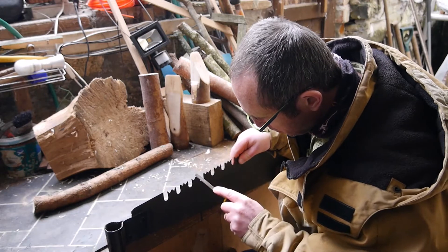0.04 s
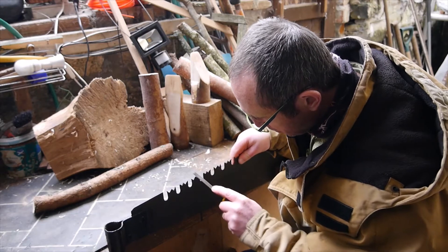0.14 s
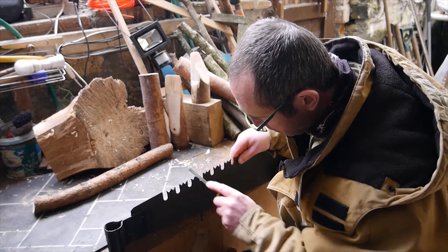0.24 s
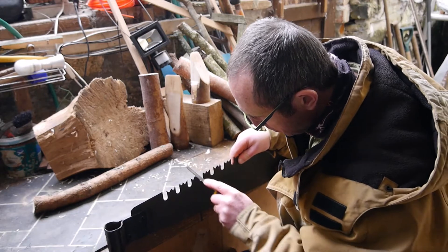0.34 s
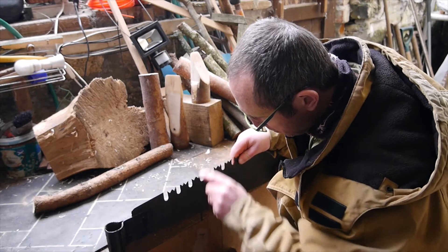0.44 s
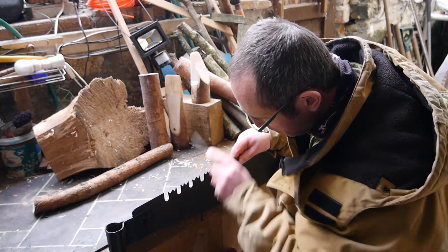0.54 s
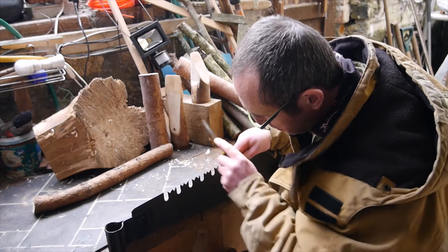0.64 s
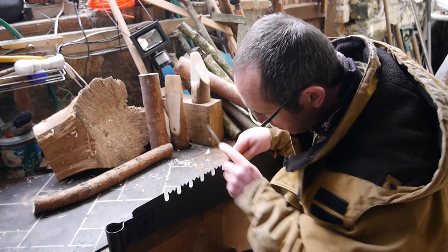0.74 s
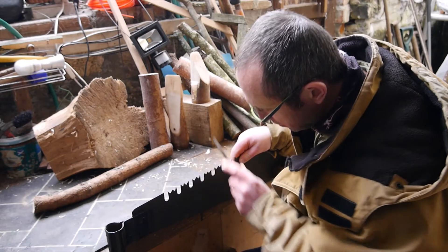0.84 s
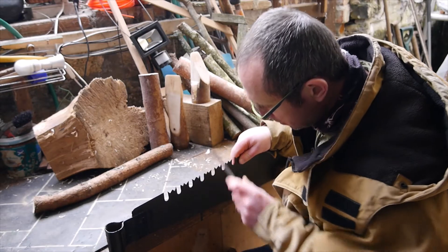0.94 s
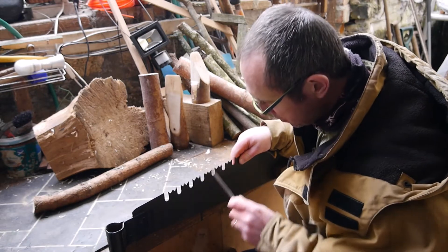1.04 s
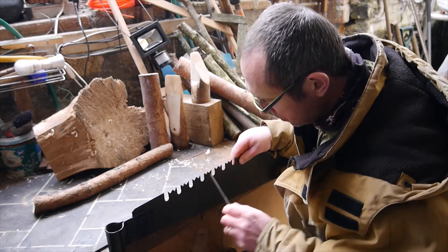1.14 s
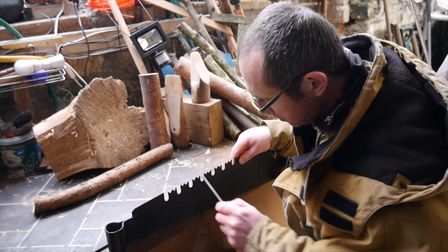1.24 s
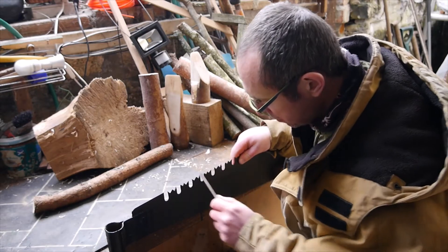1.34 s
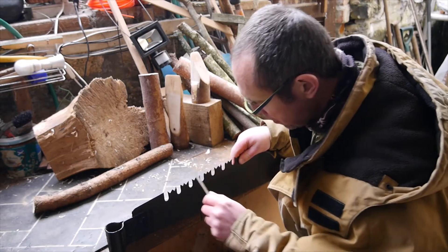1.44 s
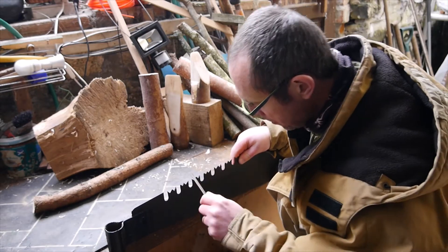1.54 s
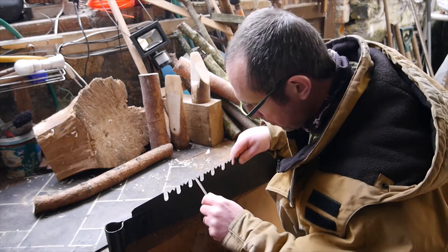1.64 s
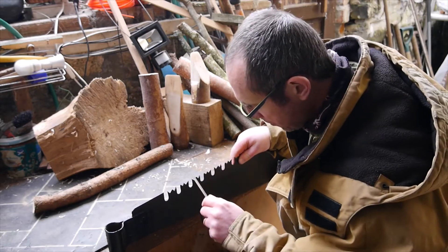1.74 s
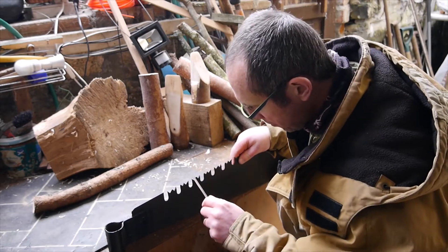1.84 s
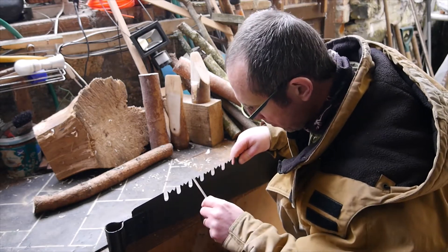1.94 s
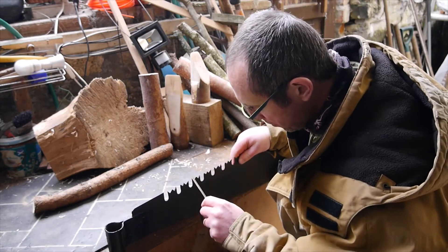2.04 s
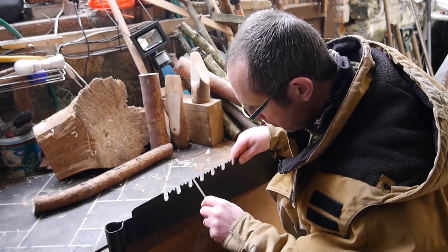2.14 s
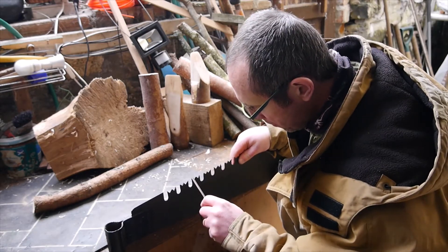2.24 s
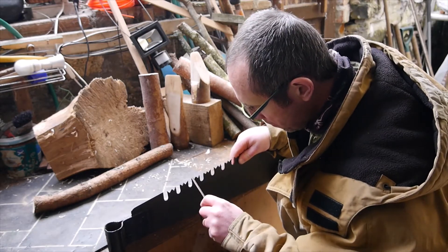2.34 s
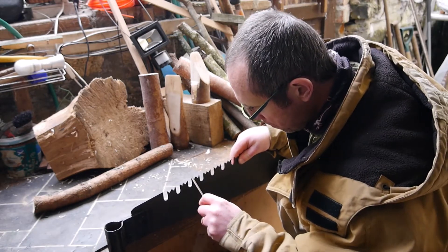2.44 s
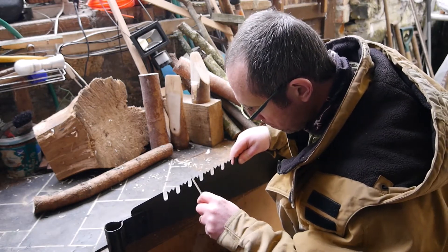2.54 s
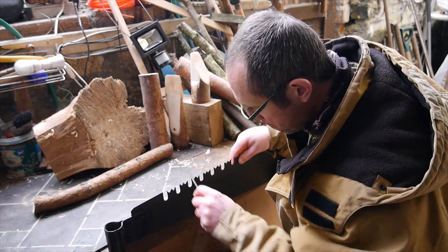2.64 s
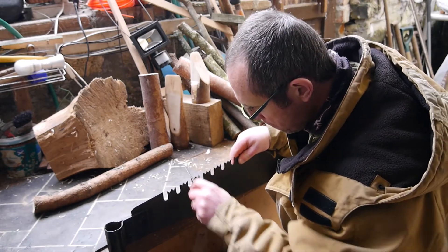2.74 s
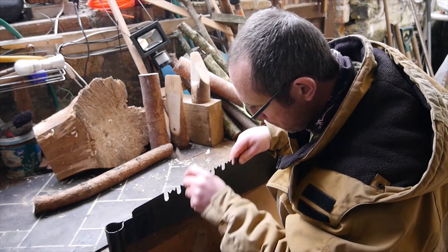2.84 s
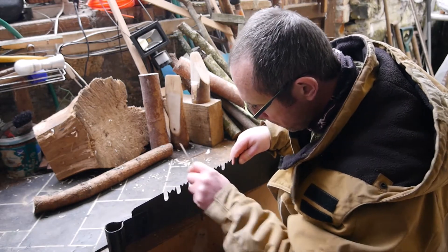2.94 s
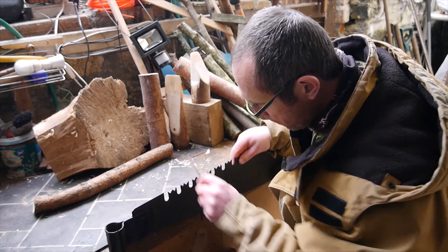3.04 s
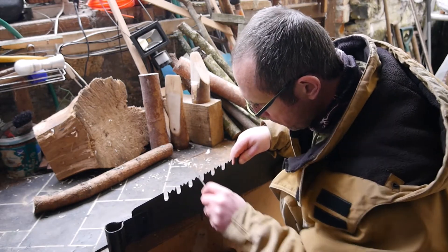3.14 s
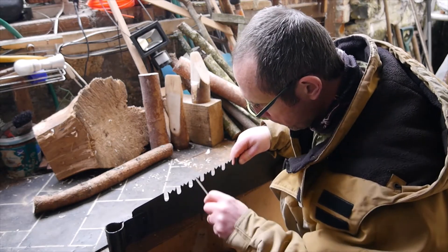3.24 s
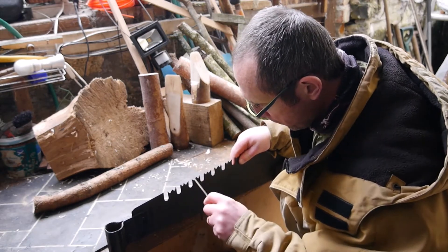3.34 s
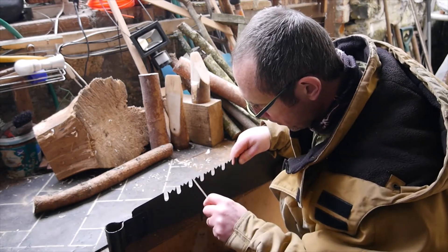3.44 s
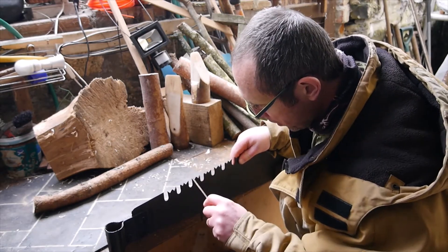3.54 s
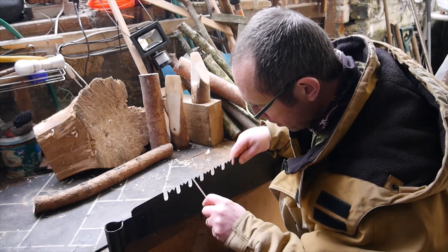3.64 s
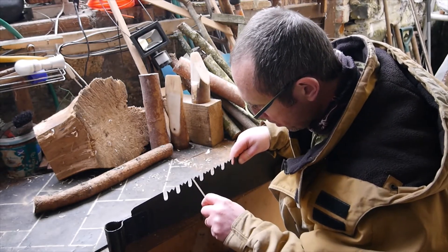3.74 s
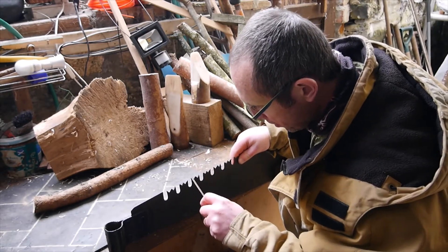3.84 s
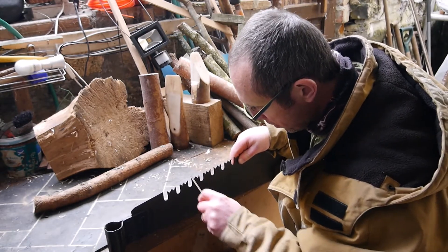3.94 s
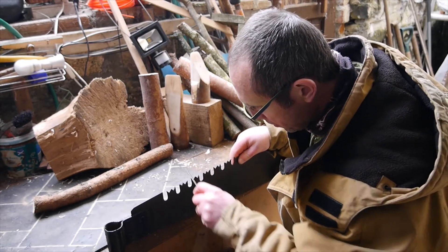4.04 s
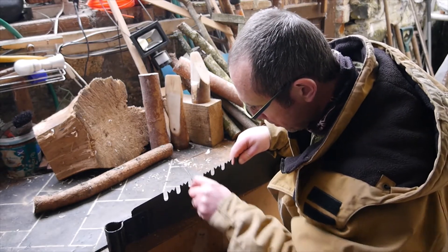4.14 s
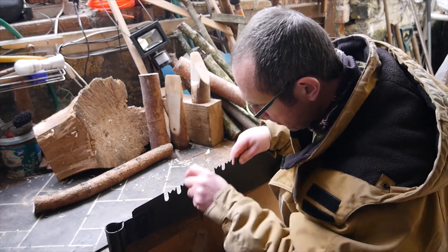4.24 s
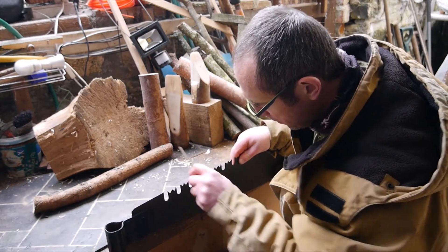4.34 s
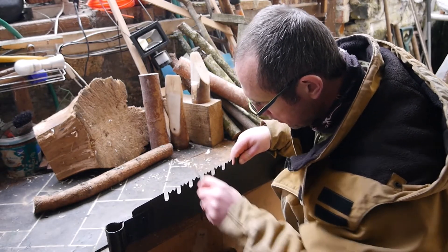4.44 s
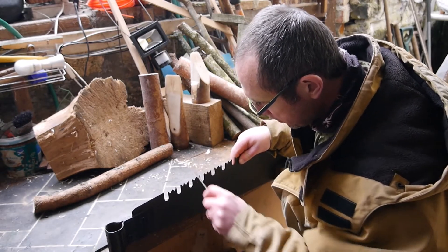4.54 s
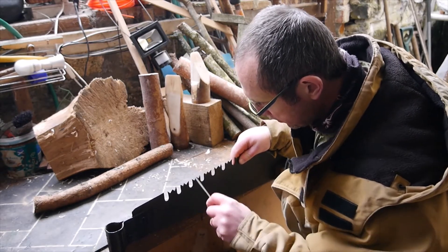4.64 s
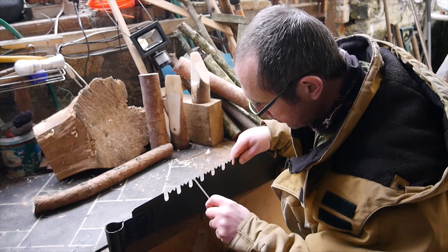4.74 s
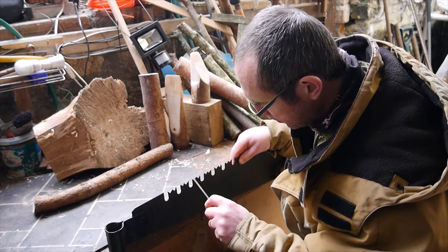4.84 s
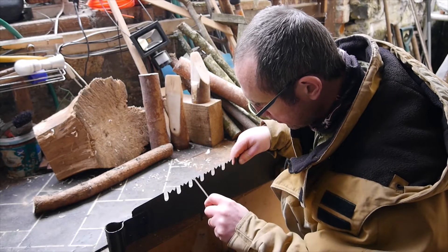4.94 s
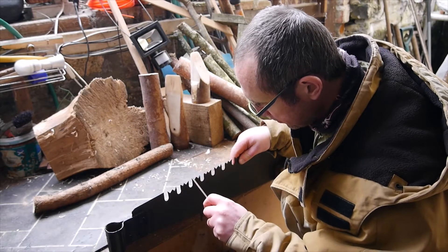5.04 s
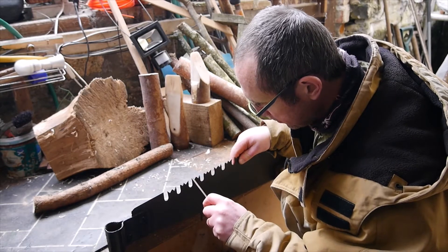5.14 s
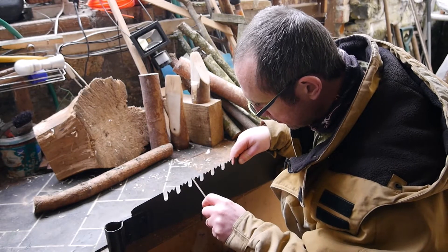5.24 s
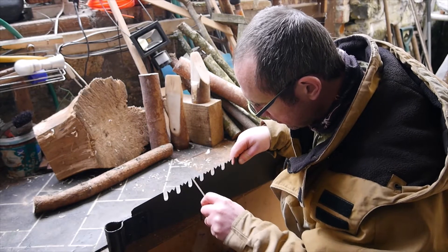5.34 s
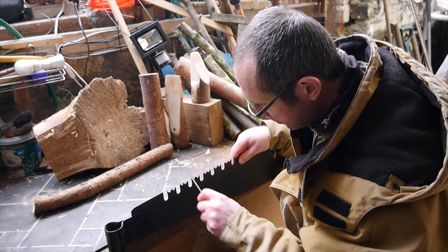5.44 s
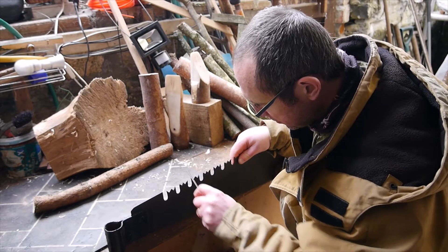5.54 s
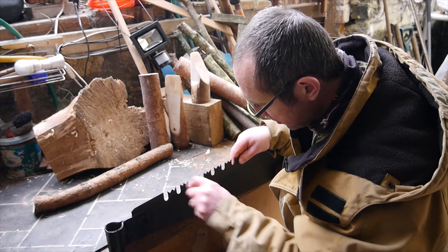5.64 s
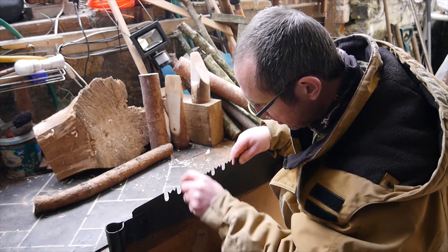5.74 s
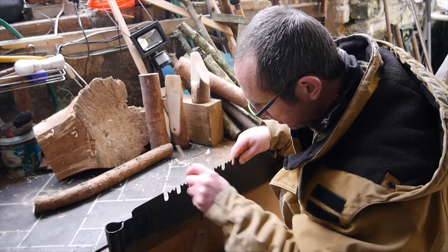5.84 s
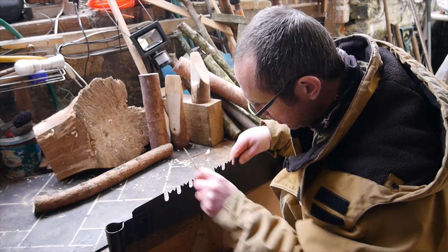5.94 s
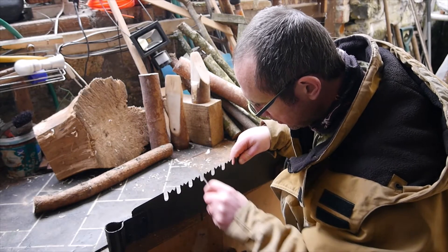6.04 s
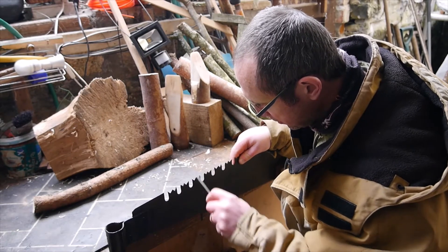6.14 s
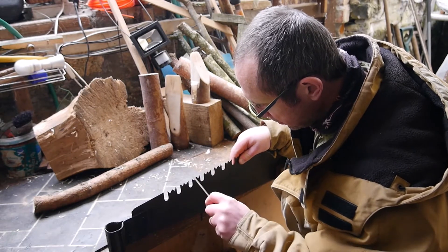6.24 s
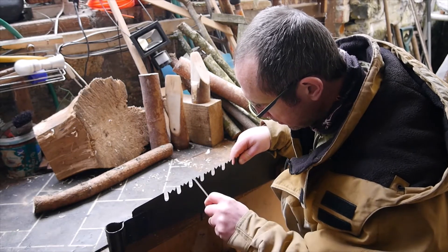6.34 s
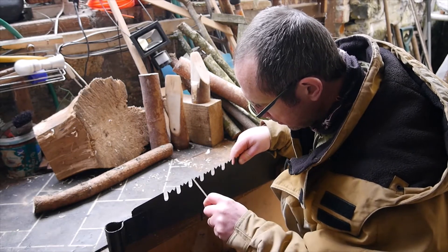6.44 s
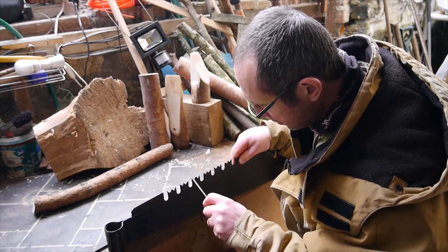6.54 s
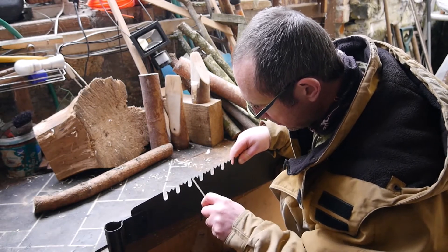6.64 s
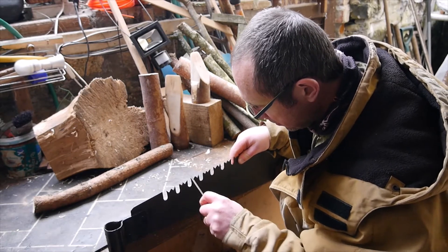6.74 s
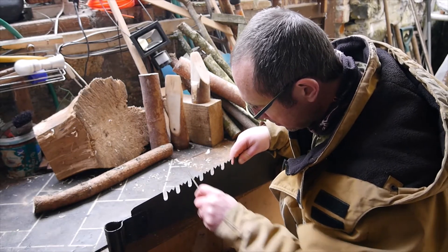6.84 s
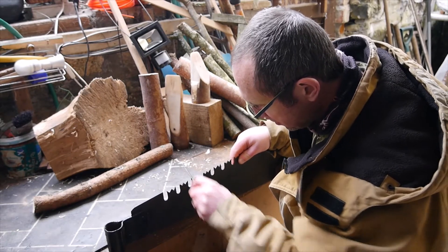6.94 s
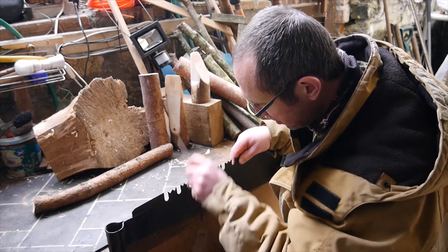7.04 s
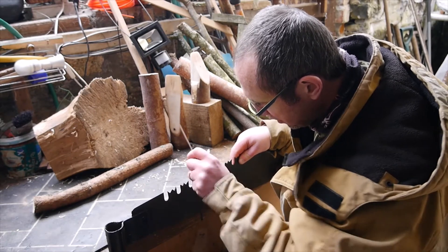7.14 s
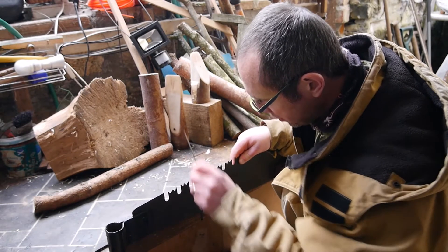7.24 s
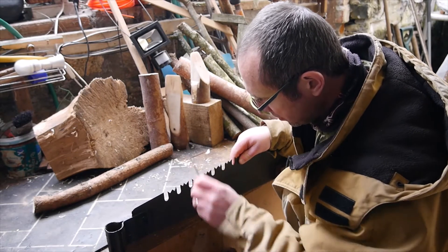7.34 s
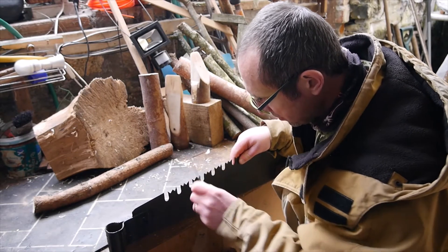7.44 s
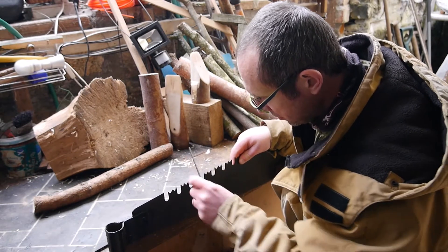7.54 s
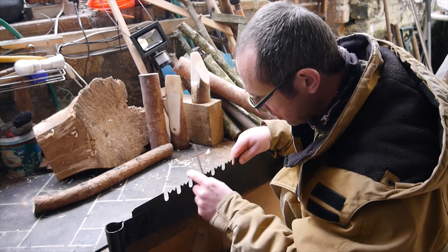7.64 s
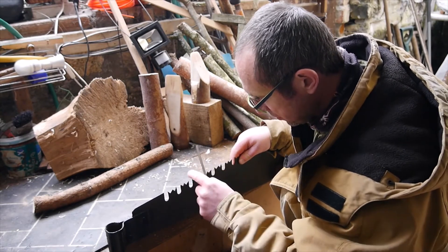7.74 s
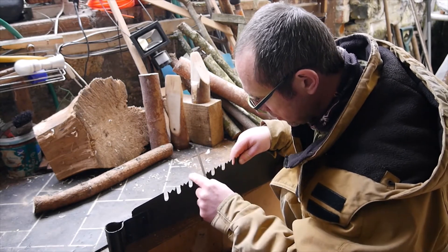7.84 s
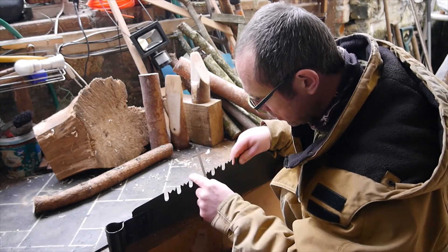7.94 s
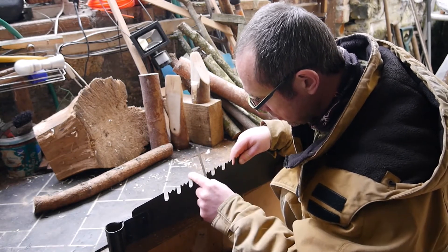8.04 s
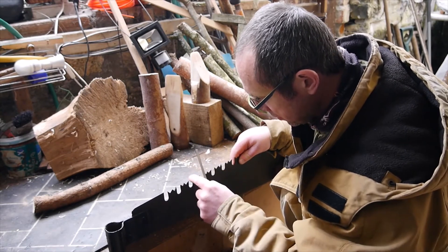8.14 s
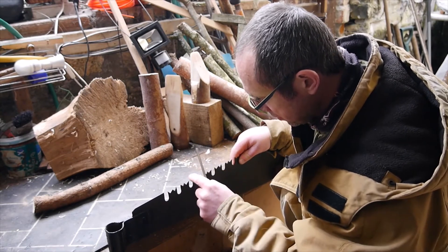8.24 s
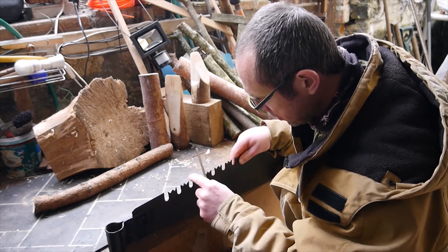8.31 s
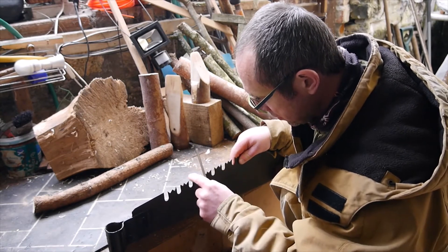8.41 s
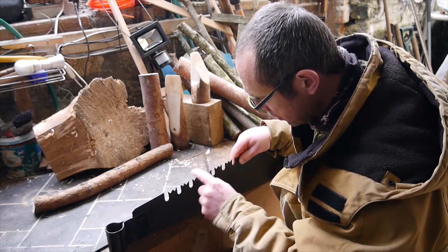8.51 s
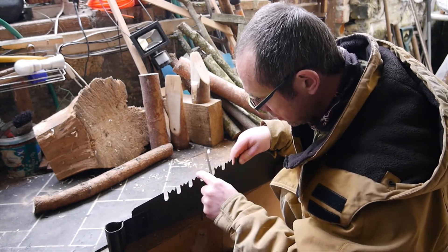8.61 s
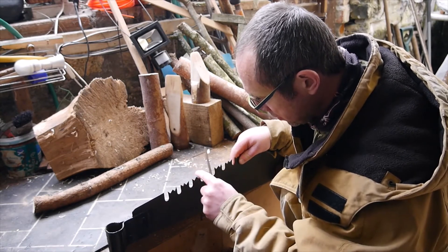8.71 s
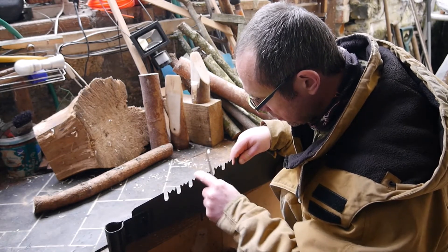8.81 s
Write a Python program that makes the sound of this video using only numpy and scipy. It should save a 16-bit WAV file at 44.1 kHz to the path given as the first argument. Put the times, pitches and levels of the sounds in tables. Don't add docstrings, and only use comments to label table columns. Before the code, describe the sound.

A small steel file rasps five slow strokes across a big saw's teeth, knocking the wooden bench, while a bird whistles faintly outside.

```python
import sys
import numpy as np
from scipy import signal
from scipy.fft import rfft, irfft, next_fast_len
from scipy.io import wavfile
from scipy.ndimage import uniform_filter1d

SR = 44100
rng = np.random.default_rng(int(sys.argv[2]) if len(sys.argv) > 2 else 0)


def to_linear_factor(level_db):
    exponent = np.asarray(level_db, float) / 20
    return 10 ** exponent


def inscribe(sig):
    pcm = np.round(np.clip(np.atleast_2d(sig).T, -1, 1) * 32767)
    wavfile.write(sys.argv[1], SR, pcm.astype(np.int16))


N = 391166

# [t/s, pressure level/dB, speed level/dB]
STROKES = [
    [(0.16, -29.5, -50), (0.178, -30.5, -43), (0.354, -19.5, -34), (0.372, -27, -38.5),
     (0.392, -21.5, -36.5), (0.476, -25, -28.5), (0.52, -22.5, -17.5), (0.55, -30.5, -28)],
    [(2.43, -63, -59), (2.448, -32, -52), (2.458, -36.5, -42.5), (2.512, -38, -50), (2.526, -32.5, -40),
     (2.666, -17.5, -35), (2.812, -17.5, -21), (2.85, -27, -26.5)],
    [(3.89, -44, -70), (3.902, -37, -42.5), (3.95, -20.5, -32), (4.0, -20.5, -29.5), (4.076, -13.5, -27),
     (4.116, -19, -27), (4.228, -16.5, -20), (4.27, -28, -33)],
    [(5.35, -36, -53), (5.368, -26.5, -46), (5.456, -28, -34), (5.496, -23, -34), (5.536, -22.5, -38),
     (5.686, -13.5, -26), (5.764, -27.5, -16), (5.79, -29.5, -31.5)],
    [(6.71, -43, -59), (6.726, -28.5, -49), (6.78, -21.5, -34), (6.804, -27.5, -56), (6.816, -15.5, -30),
     (6.926, -15.5, -24), (7.026, -18.5, -18.5), (7.05, -23, -27)],
]
STROKE_LEG_DB = [-4, -5, -8, -5, -10.5]
# [t/s, length/s, pressure level/dB, speed level/dB]
DRAGS = [(0.063, 0.11, -45, -59), (0.716, 0.39, -45.5, -48.5), (1.12, .04, -52, -60),
         (2.073, 0.043, -49, -45), (2.289, 0.028, -39, -51.5), (2.355, 0.033, -49, -66),
         (2.95, 0.066, -45, -57), (5.323, .04, -44, -60), (5.594, .05, -24, -34),
         (5.745, 0.029, -30, -18.5), (0.137, .03, -38, -59), (0.931, 0.065, -45, -57),
         (8.098, .03, -56, -59), (7.484, 0.029, -52, -68), (3.067, 0.079, -46, -60),
         (3.518, 0.077, -46, -41.5), (3.726, 0.06, -30, -41.5), (3.819, 0.058, -36, -54),
         (4.413, 0.11, -42, -55), (5.077, .12, -45.5, -49), (5.245, 0.071, -44, -62),
         (6.05, 0.04, -41, -52.5), (6.438, 0.082, -45, -70), (6.656, 0.093, -41.5, -61),
         (7.16, 0.34, -55.5, -59.5)]
# [t/s, ring level/dB, knock re ring level/dB]
TAPS = [(0.1786, -39, 15.5), (2.0354, -48, 3), (2.0822, -43, -5), (2.2872, -48, -11), (2.4554, -44, 19),
        (2.5279, -41.5, 17), (3.5222, -29, -19), (3.7187, -45, -4), (3.7409, -38, 8), (3.8272, -46.5, 13),
        (3.903, -37, 10.5), (5.0943, -30.5, -13), (5.367, -37, 6), (5.5722, -40, 20), (6.059, -45, -13),
        (6.725, -37, 17), (6.7645, -40, 5), (6.8143, -29.5, 16), (8.1094, -49, 8)]
# [t/s, knock level/dB]
CATCHES = [(0.307, -10.5), (2.612, -16.5), (2.699, -17), (2.769, -7.5), (3.546, -31.5), (3.948, -16),
           (4.024, -15), (4.066, -5.5), (4.083, -12), (4.171, -5.5), (5.368, -23), (5.478, -19),
           (5.494, -9.5), (5.625, -4.5), (5.708, -7), (6.844, -2), (6.861, -6), (6.91, -7), (6.929, -8)]
# [t/s, f/Hz, level/dB, t60/s]
LONE_RINGS = [(.53, 4940, -32, .2), (1.13, 210, -35.5, .15), (2.87, 195, -31.5, .5), (3.89, 190, -27, 0.37),
              (5.092, 6000, -38, 0.14), (5.44, 5990, -32, .2), (7.09, 255, -36, .35),
              (4.22, 4390, -22, 0.21), (5.75, 3400, -16, 0.1), (8.108, 6000, -49, .1),
              (5.761, 200, -18, 0.26), (5.803, 722, -18, 0.11), (7.009, 5980, -16, 0.13),
              (5.748, 6100, -18, 0.13), (6.07, 93.6, -37.5, 0.42), (6.8, 102.5, -25.5, 0.48),
              (6.9, 627, -9, 0.37)]
# [f/Hz, width/Hz, level/dB]
LEG_MODES = [(200, 15.5, -6), (249, 28, -7), (297, 74, -16), (349, 112, -9.5)]
BENCH_MODES = [(403, 14, -13), (470.4, 37, -4.5), (578.2, 38.6, -1), (628, 26.4, -2), (711.6, 31.5, -7),
               (891, 26, -10.5), (950.6, 40, -2)]
CLAMP_MODES = [(1640, 220, -16), (2400, 31, -3), (2670, 114, -5)]
BLADE_MODES = [(4175, 55, -2), (4385, 45, -5), (5770, 45, -9), (5990, 60, -1), (6170, 45, -10),
               (6920, 45, -8), (7200, 110, -7), (7655, 60, -6), (8050, 35, -10), (8200, 35, -6),
               (8400, 130, -3), (9160, 60, 0), (9340, 40, -5), (10250, 60, -5), (10600, 45, -11),
               (11100, 230, -15), (11900, 45, -18), (13400, 200, -28), (13900, 48, -21), (14400, 42, -25)]
# [f/Hz, density level/dB per Hz]
LEG_CROWD = [(59, -46), (100, -20), (194, -7.5), (329, -2.5), (390, -7), (510, -49), (860, -120)]
BENCH_CROWD = [(210, -30), (360, -3.5), (521, -3), (619, 1), (782, -5), (1250, -19), (1620, -18),
               (2750, -120)]
CLAMP_CROWD = [(650, -31), (1100, -6), (1670, 0.5), (1970, -3.5), (2920, -9), (3530, -15.5), (3800, -4),
               (4940, -40), (8360, -120)]
BLADE_CROWD = [(2180, -17.5), (3700, -8), (4230, -3.5), (5180, -4), (5820, -5.5), (6580, -6), (9450, 2.5),
               (13200, -19.5), (14400, -22), (15500, -28), (16000, -54)]
# [f/Hz, t60/s]
CROWD_T60 = [(100, 0.29), (500, 0.079), (2000, 0.1), (6000, 0.099), (14000, 0.045)]
# [f/Hz, width/Hz, level/dB]
MODE_GAPS = [(3700, 190, -10.5), (5370, 270, -1.5)]
# [f/Hz, likeness/1]
NEAR_SAME = [(60, 0.96), (200, 0.99), (600, 0.99), (1000, 0.76), (1600, .6), (3000, 0.45), (5500, 0.68),
             (9000, 0.47), (13000, 0.55)]
# [f/Hz, level/dB]
NEAR_LEFT = [(60, 4), (240, 0), (950, 1.5), (3770, 2.5), (15000, 2)]
# [t/s, length/s, first pitch f/Hz, slide/Hz, level/dB]
NOTES = [
    (1.765, .125, 7300, -140, -48.5),
    (1.903, 0.077, 5800, -170, -50.5),
    (2.002, 0.13, 6970, -83, -46),
    (2.238, 0.12, 4335, 30, -42.5),
    (5.986, .1, 7330, -110, -52),
    (6.11, .11, 5910, -170, -60),
    (6.2, 0.18, 7030, -87, -57),
    (6.432, 0.032, 4250, 110, -40),
    (6.485, 0.064, 4340, 10, -47.5),
    (6.602, 0.12, 7220, -110, -52.5),
]
# [f/Hz, density level/dB per Hz]
WASH = [(18, -60), (30, -45), (65, 4.5), (103, -21), (190, -5), (443, -7), (544, -5.5), (638, -8),
        (699, -6), (7000, -26), (9100, -53), (15400, -120)]
# [f/Hz, density level/dB per Hz]
HISS = [(3530, -56), (6000, -18), (7290, -10.5), (9720, -1.5), (11900, -15.5), (15100, -21), (15800, -17)]
# [f/Hz, likeness/1]
HUSH_SAME = [(60, 0.38), (180, 0.96), (550, 0.27), (1650, 0.3), (4970, 0.027), (15000, 0.4)]


def filing():
    legs_db, pressure_db, speed_db = contact()
    coarse = slips(500, 1.97, 2.4, 0.57)
    fine = slips(3000, 3.6, 2.07, 0.55)
    clamp_gain = to_linear_factor(-3 + pressure_db + 0.86 * (speed_db - pressure_db))
    clamp_gain = clamp_gain / np.hypot(1, clamp_gain / to_linear_factor(-21.5))
    legs = to_linear_factor(legs_db) * coarse
    bench = to_linear_factor(pressure_db - 1.0) * coarse
    clamp = clamp_gain * evened(coarse + 1.7 * fine)
    blade = to_linear_factor(1.5) * to_linear_factor(speed_db) * fine
    bare = lone_rings()
    add_taps(legs, bench, clamp, blade, bare)
    add_catches(bench, clamp)

    place_rad = 2 * np.pi * 1.7 * np.arange(N) / SR + 0.79 * wander(6.96)
    size = next_fast_len(N + SR)
    near = rfft(bare, size) + shaken(legs, place_rad, size, LEG_MODES, LEG_CROWD, 5.2, 2.24)
    near = near + shaken(bench, place_rad, size, BENCH_MODES, BENCH_CROWD, 2.9, 4.0)
    near = near + shaken(clamp, place_rad, size, CLAMP_MODES, CLAMP_CROWD, -8.5, 4)
    near = near + shaken(blade, place_rad, size, BLADE_MODES, BLADE_CROWD, -2.0, 7.6)
    return irfft(near * radiation(np.fft.rfftfreq(size, 1 / SR)), size)[:, :N]


def contact():
    land_db_per_s = 900
    lift_db_per_s = np.array([[200], [304], [304]])
    leg_speed_share = 0.083
    drag_leg_db, drag_swell_db = -4.5, 11.5
    t = np.arange(N) / SR + 0.003
    power = np.full((3, N), 1e-12)
    for stroke, leg_db in zip(STROKES, STROKE_LEG_DB):
        s, pressure, speed = np.transpose(stroke)
        legs = leg_db + pressure + leg_speed_share * (speed - pressure)
        away_db = land_db_per_s * np.maximum(s[0] - t, 0) + lift_db_per_s * np.maximum(t - s[-1], 0)
        curves_db = np.array([np.interp(t, s, db) for db in (legs, pressure, speed)])
        power += to_linear_factor(curves_db - away_db) ** 2
    for start, length, pressure, speed in DRAGS:
        on = slice(max(round((start - 0.1) * SR), 0), round((start + length + 0.3) * SR))
        u = (t[on] - start) / length
        arch_db = -drag_swell_db * (2 * np.clip(u, 0, 1) - 1) ** 2
        away_db = length * (land_db_per_s * np.maximum(-u, 0) + lift_db_per_s * np.maximum(u - 1, 0))
        levels_db = np.array([[drag_leg_db + pressure], [pressure], [speed]])
        power[:, on] += to_linear_factor(levels_db + arch_db - away_db) ** 2
    return 10 * np.log10(power)


def slips(rate_hz, spread_db, chatter_db, grit):
    size = to_linear_factor(spread_db * np.minimum(rng.exponential(1, N), 4)) * rng.choice([-1, 1], N)
    jolts = evened(size * (rng.random(N) < rate_hz / SR))
    jolts = jolts + grit * rng.standard_normal(N)
    return evened(jolts * to_linear_factor(chatter_db * wander(74)))


def add_taps(legs, bench, clamp, blade, bare):
    for s, db, knock_db in TAPS:
        at = round(s * SR)
        bare[at:at + 2] += to_linear_factor(db - 4) * np.array([1, -1])
        blade[at] += to_linear_factor(db + 24.5)
        clamp[at] += to_linear_factor(db + 13.0)
        bench[at] += to_linear_factor(db + knock_db + 21.5)
        legs[at] += to_linear_factor(db + knock_db + 15.0)


def add_catches(bench, clamp):
    for s, db in CATCHES:
        at = round(s * SR)
        bench[at] += to_linear_factor(db + 18)
        clamp[at] += to_linear_factor(db + 4)


def lone_rings():
    bare = np.zeros(N)
    t = np.arange(SR // 2) / SR
    for s, hz, db, t60_s in LONE_RINGS:
        at = round(s * SR)
        shape = to_linear_factor(db - 60 * t / t60_s) * np.minimum(t / 0.011, 1)
        beat = np.sin(2 * np.pi * hz * t) + 0.57 * np.sin(2 * np.pi * (hz + 38) * t)
        bare[at:at + len(t)] += shape * beat
    return bare


def shaken(drive, place_rad, size, *build):
    total = 0
    for k in range(3):
        share = np.sqrt(2 / 3) * np.cos(place_rad + k * np.pi / 3)
        total = total + rfft(drive * share, size) * rfft(body(*build), size)
    return total


def body(modes, colour, modes_db, vary_db):
    hz = np.fft.rfftfreq(512, 1 / SR)
    frame_s = np.arange(90) * 128 / SR
    z = pair((len(hz), len(frame_s)), read(NEAR_SAME, hz))
    age_s = np.maximum(frame_s - 256 / SR, 0)
    t60_s = np.maximum(read(CROWD_T60, hz), 0.01)
    z = z * to_linear_factor(read(colour, hz)[:, None] - 60 * age_s / t60_s[:, None])
    crowd = signal.istft(z, nperseg=512, noverlap=384)[1][:, 256:]
    t = np.arange(crowd.shape[1]) / SR
    strong = np.zeros_like(crowd)
    for f, width, db in modes:
        reach, turn, side, shift = rng.standard_normal(4)
        apart = np.arccos(np.clip(read(NEAR_SAME, f), -1, 1)) * np.sign(side)
        phase = np.pi * turn + np.array([[0], [apart]])
        tone = np.sin(2 * np.pi * (f + 0.29 * width * shift) * t + phase)
        strong += to_linear_factor(db + vary_db * reach) * width * np.exp(-np.pi * width * t) * tone
    both = evened(crowd) + to_linear_factor(modes_db) * evened(strong)
    both *= np.minimum(t / 0.00024, 1)
    return both / np.linalg.norm(both[0])


def radiation(hz):
    lean_db = read(NEAR_LEFT, hz) / 2
    gaps_db = sum(db / (1 + (2 * (hz - f) / width) ** 2) for f, width, db in MODE_GAPS)
    low_cut = to_linear_factor(-11.0) + (1 - to_linear_factor(-13.5)) / (1 + (140 / (hz + 1)) ** 6)
    low_cut /= 1 + (45 / (hz + 1)) ** 4
    return to_linear_factor(np.array([lean_db, -lean_db]) + gaps_db) * low_cut


def bird():
    rise_s, fade_db, peak_share = 0.014, -28, 0.31
    song = np.zeros(N)
    waver = wander(116)
    for start, length, hz, slide_hz, db in NOTES:
        on = slice(round(start * SR), round((start + length) * SR))
        t = np.arange(on.stop - on.start) / SR
        pitch_hz = (hz + slide_hz * np.sqrt(t / length)) * (1 + 0.005 * waver[on])
        shape = np.clip(np.minimum(t, length - t) / rise_s, 0, 1)
        shape = shape * to_linear_factor(fade_db * (t / length - peak_share) ** 2)
        song[on] += to_linear_factor(db + 3.5) * shape * np.sin(2 * np.pi * np.cumsum(pitch_hz) / SR)
    lag_s = np.arange(SR // 8) / SR
    echoes = rng.standard_normal((2, len(lag_s))) * to_linear_factor(-60 * lag_s / 0.17)
    wet = signal.oaconvolve(song[None], echoes / np.linalg.norm(echoes[0]), axes=1)[:, :N]
    return song * to_linear_factor([[0.5], [-2.5]]) + wet


def hush():
    frames, hz = N // 256 + 5, np.fft.rfftfreq(1024, 1 / SR)
    patches = uniform_filter1d(rng.standard_normal((len(hz), frames)), 10, 0)
    patches = evened(uniform_filter1d(patches, 16, 1))
    swell = evened(uniform_filter1d(rng.standard_normal(frames), 50))
    outdoor = 1 / (1 + hz[:, None] / 2500)
    colour = np.hypot(to_linear_factor(read(WASH, hz)), to_linear_factor(read(HISS, hz) - 16.5))
    colour = colour * hz ** 2 / (hz ** 2 + 50 ** 2)
    z = pair((len(hz), frames), read(HUSH_SAME, hz))
    z = z * colour[:, None] * to_linear_factor(outdoor * (0.81 * patches + 1.32 * swell))
    return to_linear_factor(-45) * evened(signal.istft(z, nperseg=1024, noverlap=768)[1][:, :N])


def evened(x):
    return x / np.sqrt(np.mean(x ** 2) + 1e-20)


def read(points, hz):
    f, value = np.transpose(points)
    return np.interp(np.log(hz + 1), np.log(f + 1), value)


def pair(shape, same):
    a, b, c, d = rng.standard_normal((4,) + shape)
    same = np.clip(same, -1, 1)[:, None]
    left = a + 1j * b
    return np.array([left, same * left + np.sqrt(1 - same ** 2) * (c + 1j * d)])


def wander(rate_hz):
    width = int(SR / rate_hz)
    return evened(uniform_filter1d(uniform_filter1d(rng.standard_normal(N), width), width))


def scene():
    return filing() + bird() + hush()


def roll_off(x):
    return signal.sosfilt(signal.butter(12, 16420, fs=SR, output="sos"), x)


def record(dry):
    edge = signal.firwin(511, 15720, window=("kaiser", 9), fs=SR)
    limited = 0.87 * np.tanh(dry / 0.92)
    mix = signal.oaconvolve(limited, edge[None], "same", axes=1)
    return roll_off(mix)


dry = scene()
out = record(dry)
inscribe(out)
```